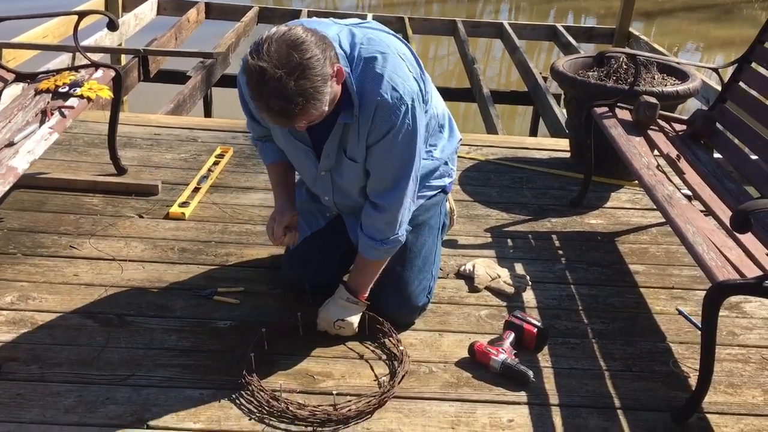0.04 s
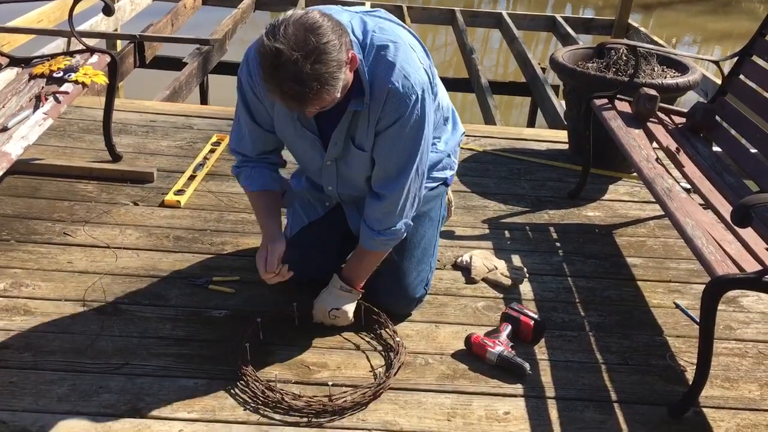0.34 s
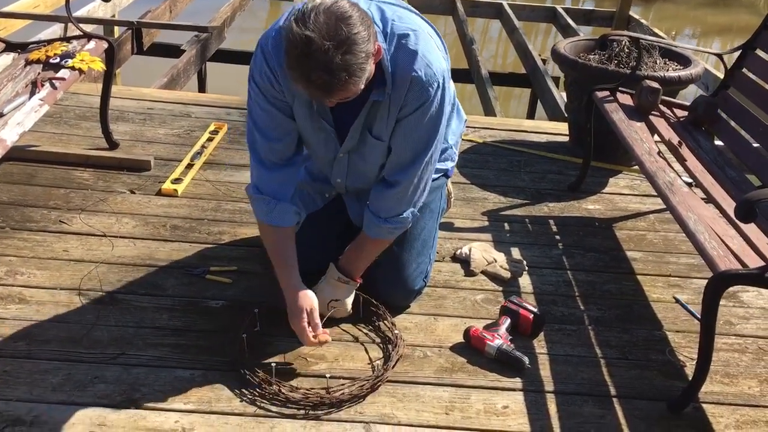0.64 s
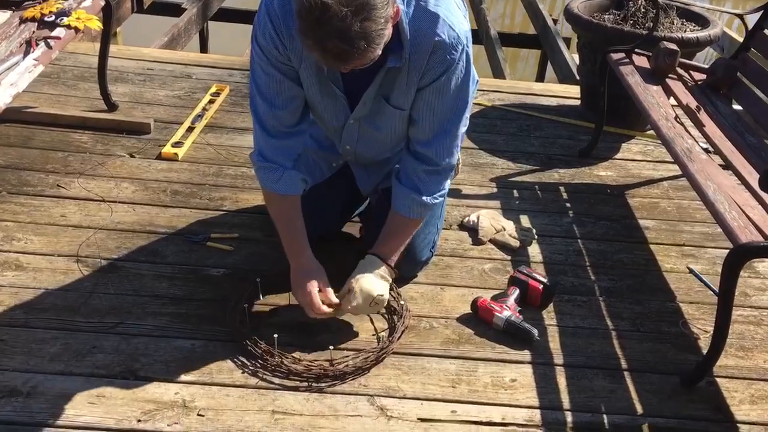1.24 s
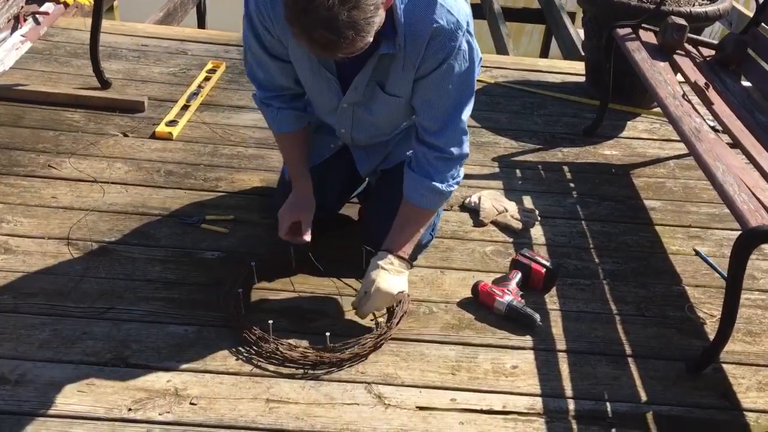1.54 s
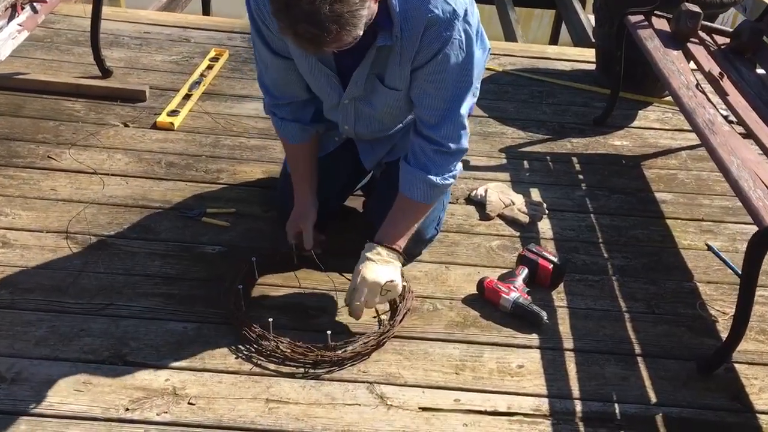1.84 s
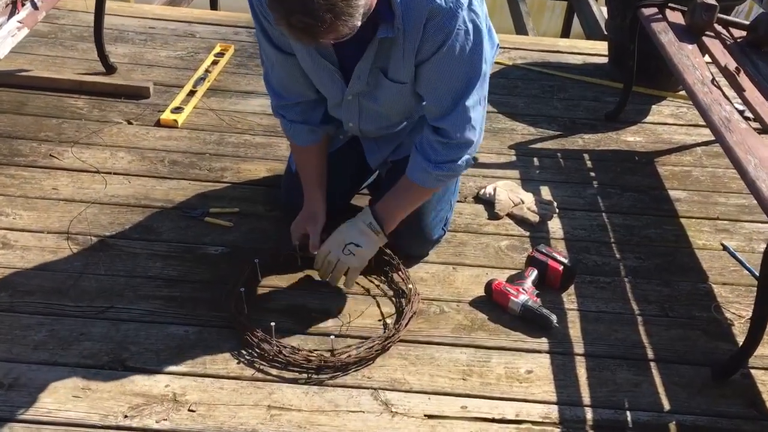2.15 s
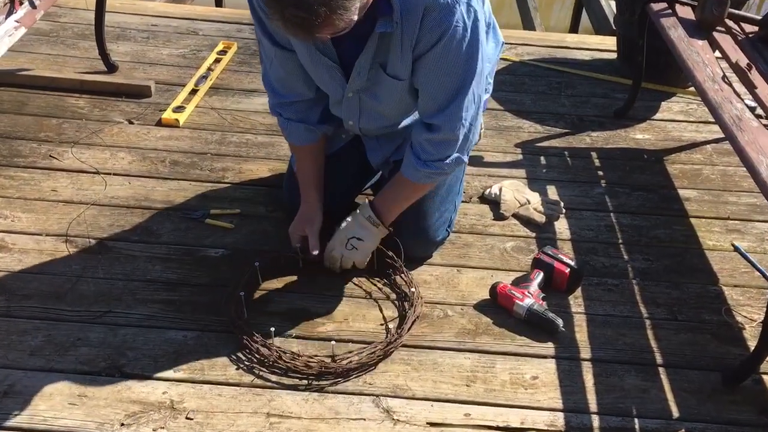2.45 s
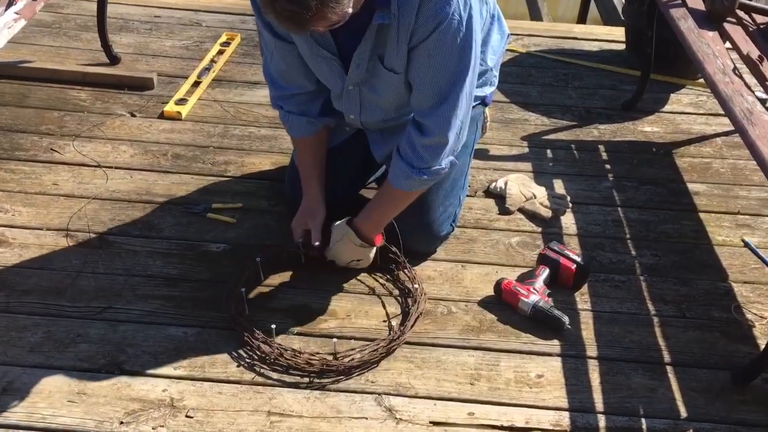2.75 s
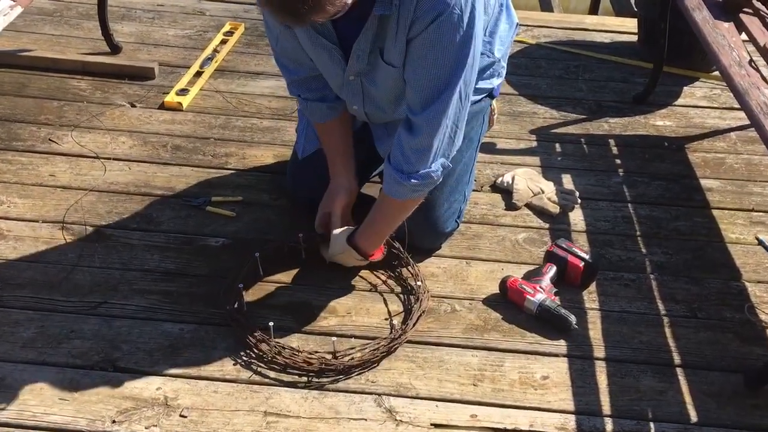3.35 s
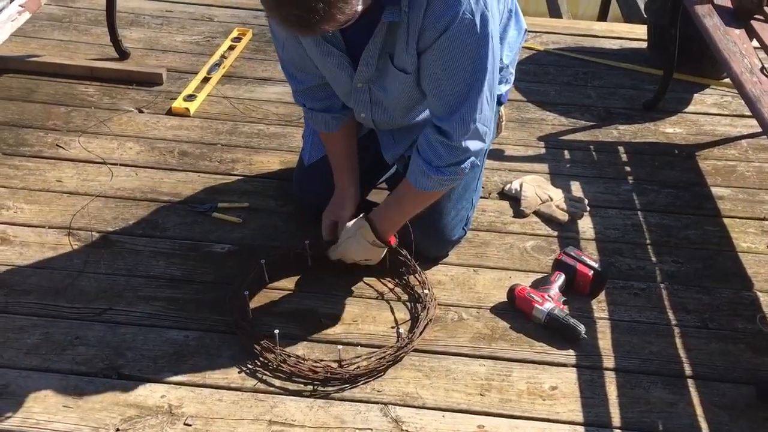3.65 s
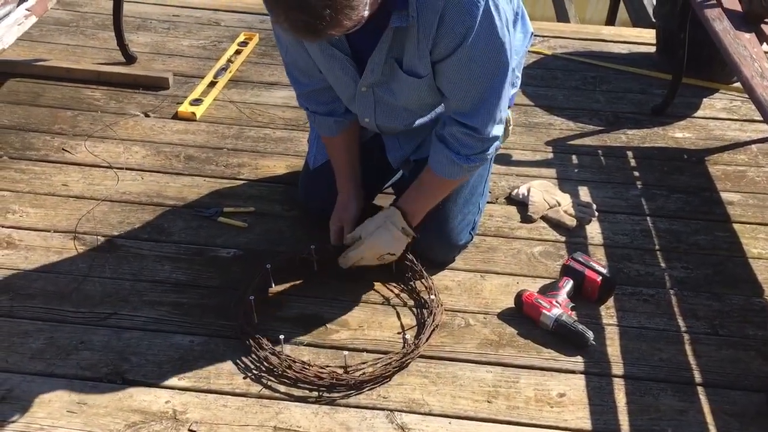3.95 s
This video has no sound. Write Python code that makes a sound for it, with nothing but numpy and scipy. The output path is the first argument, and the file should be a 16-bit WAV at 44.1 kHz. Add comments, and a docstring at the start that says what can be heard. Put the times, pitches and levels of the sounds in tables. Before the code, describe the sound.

Barbed wire is handled on outdoor wooden boards: scattered ringing clicks, dull knocks and brief rasps, then a bright ping in a busier cluster, and a few last taps. Wind rumbles and bumps softly at the microphone throughout.

```python
"""Rusty barbed wire on a wooden deck

A coil of barbed wire is handled outdoors: strands catch, click and tap the boards, setting wire and
wood ringing, and one barb snaps free. Wire and glove scrape between the clicks.
Soft low bumps and a breeze rumble at the microphone, over a faint outdoor hiss."""
import sys
import numpy as np
from scipy.fft import rfft, irfft
from scipy.io import wavfile
from scipy.ndimage import map_coordinates

SR = 44100
rng = np.random.default_rng(int(sys.argv[2]) if len(sys.argv) > 2 else 0)


def store_wav(level_fs):
    """Save 16-bit WAV to argv[1]."""
    pcm = np.round(np.clip(np.atleast_2d(level_fs), -1, 1) * 32767)
    wavfile.write(sys.argv[1], SR, pcm.T.astype(np.int16))


N = 176400  # 4 seconds
TOP_HZ = 16000

# The pitches at which the deck boards ring: (pitch [Hz], width [Hz], level [dB])
BOARD_TONES = [(692, 78, 2), (939, 48, 0), (1300, 235, -2), (1800, 120, -10.5), (2370, 120, -14.5),
               (3650, 200, -33)]


def clicks():
    """Each contact rings the boards and a different length of wire; the highest part dies first."""
    # Wire contacts: (time [s], boards level [dB], clack level [dB], wire ring level [dB])
    contacts = [(.002,-38.5,-38.5,-40.5), (.014,-62,-48.5,-44.5), (.253,-47,-49.5,-60),
                (.379,-48,-48,-52.5), (.386,-46,-56,-52.5), (.494,-54.5,-51,-61.5), (.519,-59.5,-61,-70),
                (.682,-46,-50,-56), (.739,-51.5,-61.5,-78), (.809,-48.5,-50.5,-67), (1.229,-43,-46.5,-50.5),
                (1.254,-44,-50.5,-55.5), (1.361,-50.5,-49.5,-57), (1.5,-49,-58,-63),
                (1.516,-46.5,-51.5,-65), (1.563,-62,-62.5,-65), (1.617,-47,-54,-64), (1.823,-51,-53,-62.5),
                (2.022,-42,-50.5,-62), (2.109,-43,-49.5,-47.5), (2.263,-54.5,-59.5,-64),
                (2.512,-45,-43.5,-47), (2.527,-47,-43.5,-46.5), (2.545,-48,-48.5,-49.5),
                (2.599,-44.5,-51.5,-48.5), (2.628,-51,-63,-57), (2.643,-55,-56,-59), (2.674,-44,-51,-44),
                (2.69,-61,-60,-55), (2.736,-52,-58,-61.5), (2.789,-51.5,-56.5,-68), (2.879,-54.5,-60,-67),
                (2.98,-61,-66,-66), (3.113,-45.5,-50.5,-50.5), (3.728,-53,-53.5,-59.5), (3.747,-66,-65,-57),
                (3.784,-48.5,-51,-56.5), (3.806,-44,-47.5,-57.5), (3.846,-48.5,-55,-58.5),
                (3.935,-49.5,-54,-57)]
    # The four parts of a click, low to high: boards, clack, wire ring, fizz
    # (low edge [Hz], high edge [Hz], fade time [s], attack [s], tail level [dB], level offset [dB])
    parts = [(432, 1134, 0.076, 0.0017, -9.5, -2), (1130, 3180, 0.079, 0.00023, -26, 0),
             (3360, 9400, 0.045, 0.0002, -23, -1.5), (9600, 14000, 0.019, 0.000087, -27, 2)]
    out, t = np.zeros(N), np.arange(SR // 3) / SR
    onset = t < .012
    wire_width_hz = 70
    for start, boards_db, clack_db, wire_db in contacts:
        pitches = np.geomspace(1700, 15000, num=19) * np.exp(rng.normal(0, .06, size=19))
        wire_tones = [(hz, wire_width_hz, rng.normal(0, 3)) for hz in pitches]
        # The added constants let some noise through between the tones.
        body = lambda hz: (resonances(hz, BOARD_TONES) + amp(-9)) * (resonances(hz, wire_tones) + amp(-10))
        levels = [boards_db, clack_db, wire_db, wire_db - 9.5]
        for db, (lo, hi, fade, attack, tail_db, offset_db) in zip(levels, parts):
            noise = filtered(rng.standard_normal(len(t)), lambda hz: body(hz) * band(hz, lo, hi))
            tail = amp(tail_db) * ring(t, fade_s=.22, attack_s=.015)
            hit = noise * (ring(t, fade, attack) + tail)
            add(out, start, amp(db + offset_db) * hit / np.std(hit[onset]))
        thud = shaped_noise(len(t), lambda hz: band(hz, 170, 480))  # the deck's low answer
        add(out, start, amp(boards_db - 5) * thud * ring(t, fade_s=.15, attack_s=.00028))
    return out


def coil_echo(x):
    """Each click also travels round the coil and returns, high pitches before low ones."""
    delay_s = .017  # at 1000 Hz
    echo = lambda hz: band(hz, 600, 3500) * np.exp(-4j * np.pi * delay_s * np.sqrt(1000 * hz))
    return x + amp(-9) * filtered(np.pad(x, (0, SR // 2)), echo)[:N]


def pings():
    """A free length of wire or board rings on after some contacts."""
    # Lingering tones: (time [s], pitch [Hz], level [dB], fade time [s])
    tones = [(.495, 925, -52.5, .17), (1.361, 3300, -50, 0.038), (1.361, 2160, -45, 0.1),
             (3.784, 1810, -38, 0.041), (3.784, 722, -37.5, .14)]
    out, t = np.zeros(N), np.arange(SR // 4) / SR
    for start, hz, db, fade in tones:
        phase = 2 * np.pi * (hz * t + rng.random())
        rub = .3 * wobble(250)[:len(t)]  # rubbing on nearby strands makes the tone waver
        add(out, start, amp(db) * ring(t, fade, attack_s=.00071) * np.sin(phase + rub))
    return out


def twangs():
    """High pitches run along a bending strand faster than low ones, so a twang is a falling chirp."""
    # Waves along a strand: (time [s], travel time at 1000 Hz [s], level [dB])
    waves = [(1.234, 0.057, -51.5), (1.352, .043, -50)]
    centre_hz, width_octaves = 1880, .79  # the range that a strand carries best
    out, t = np.zeros(N), np.arange(1, SR // 8) / SR
    for start, travel_s, db in waves:
        hz = np.minimum(1000 * (travel_s / t) ** 2, TOP_HZ)
        carried = np.exp(-(np.log2(hz / centre_hz) / width_octaves) ** 2 / 2)
        rub = 1.2 * wobble(796)[:len(t)]
        add(out, start, amp(db) * carried * np.sin(2 * np.pi * np.cumsum(hz) / SR + rub))
    return out


def barb_snap():
    """A barb slips off a tight strand with a short bright ping."""
    # The tones of the snap: (pitch [Hz], level [dB], fade time [s])
    tones = [(5800, -13.5, 0.0063), (6750, -22.5, 0.0055), (5750, -50, 0.049), (2260, -15.5, 0.0036)]
    out, t = np.zeros(N), np.arange(SR // 4) / SR
    ping = sum(amp(db) * ring(t, fade, attack_s=.00053) * sine(hz, t) for hz, db, fade in tones)
    add(out, start_s=2.527, x=ping)
    return out


def squeak():
    """Wire slips on wire with a brief rising squeak."""
    start, length_s = 2.659, .017
    out, progress = np.zeros(N), np.linspace(0, 1, int(length_s * SR))
    hz = (4450 + 900 * progress) * (1 + .08 * wobble(1800)[:len(progress)])
    add(out, start, amp(-45) * np.sin(np.pi * progress) * np.sin(2 * np.pi * np.cumsum(hz) / SR))
    return out


def knocks():
    """Soft contacts ring only the low tones of a board."""
    # Dull knocks: (time [s], level [dB], pitch [Hz], fade time [s])
    hits = [(.003, -33, 170.8, 0.2), (.008, -41.5, 302, 0.23), (2.215, -39.5, 260, 0.097),
            (3.055, -39.5, 242.7, 0.13), (3.884, -38.5, 578, 0.15)]
    # The tones in each knock: (pitch [multiple of the knock's pitch], level [dB])
    tones = [(0.999, 1.5), (1.128, -3.5), (1.431, -3.5), (2.13, -15)]
    out, t = np.zeros(N), np.arange(SR // 3) / SR
    for start, db, hz, fade in hits:
        wood = sum(amp(tone_db) * sine(hz * ratio, t) for ratio, tone_db in tones)
        flutter = 1 + .45 * wobble(220)[:len(t)]
        add(out, start, amp(db) * wood * ring(t, fade, attack_s=.003) * flutter)
    return out


def scrapes():
    """Grains of rust rasp under each stroke, heard in the boards and as a hiss."""
    # Strokes of wire and glove: (peak time [s], rise [s], fall [s], body level [dB], hiss level [dB])
    strokes = [(.32, 0.05, 0.072, -57, -78), (.85, 0.048, 0.037, -50, -57), (1.53, 0.23, 0.11, -66, -75),
               (1.7, 0.062, 0.45, -66, -85), (2.42, 0.067, 0.05, -60.5, -65), (2.517, 0.03, 0.03, -43, -50),
               (2.671, 0.053, 0.018, -54, -63.5), (2.79, 0.086, 0.073, -58.5, -67.5),
               (2.91, 0.036, 0.095, -56, -71.5), (3.13, 0.19, 0.043, -61.5, -70),
               (3.323, 0.024, 0.025, -52.5, -74), (3.83, 0.15, 0.13, -59.5, -67)]
    # Tone of the scrape's lower body: (frequency [Hz], level [dB])
    body_curve = [(200, -43), (450, -1), (700, 2.5), (1500, -3.5), (2600, -5.5), (4000, -17), (8000, -84)]
    # Tone of its hiss: (frequency [Hz], level [dB])
    hiss_curve = [(1500, -30), (2800, -7), (6500, 5.5), (9000, 0), (10500, -2), (13000, -4), (16000, -14)]
    grains_per_s, catches_per_s = 1200, 90
    t = np.arange(N) / SR
    swells = np.array([np.exp(-np.where(t < peak, (abs(peak - t) / rise) ** 1.28, ((t - peak) / fall) ** 2))
                       for peak, rise, fall, _, _ in strokes])
    body_db, hiss_db = np.transpose(strokes)[-2:]
    grains = (rng.random(N) < grains_per_s / SR) * rng.standard_normal(N)
    grains *= amp(2 * rng.standard_normal(N))
    catch = amp(2 * wobble(catches_per_s))  # the stroke sticks and slips
    rasp = catch * (unit(grains) + .7 * rng.standard_normal(N))
    wood = lambda hz: colour(body_curve)(hz) * (resonances(hz, BOARD_TONES) + amp(12))
    body = unit(filtered(catch * rng.standard_normal(N), wood))
    hiss = unit(filtered(rasp, colour(hiss_curve)))
    return (amp(body_db) @ swells) * body + (amp(hiss_db) @ swells) * hiss


def bumps():
    """Soft low pushes of a wave or two, each with a puff of swirling air."""
    # Bumps at the microphone: (time [s], level [dB], pitch [Hz])
    pushes = [(.426,-39,141), (.953,-40,74.4), (1.448,-34.5,85), (1.633,-34,100), (1.741,-30.5,75),
              (2.037,-33.5,60.5), (2.114,-35.5,59), (2.225,-35.5,141), (2.492,-36,71), (2.583,-33.5,93),
              (2.882,-34,67), (3.092,-32,88), (3.176,-30,91), (3.378,-34.5,125), (3.421,-33,64),
              (3.451,-33.5,100), (3.524,-33.5,88)]
    half_length_cycles, puff_s = .89, .013
    out, t = np.zeros(N), np.arange(N) / SR
    air = shaped_noise(N, lambda hz: band(hz, 100, 240))
    for peak, db, hz in pushes:
        offset = t - peak
        push = np.exp(-abs(offset * hz / half_length_cycles) ** 3.6) * sine(hz, offset)
        puff = air * np.exp(-abs(offset) / puff_s)
        out += amp(db - .5) * push + amp(db - 10) * puff
    return out


def breeze():
    """An uneven breeze rumbles under a faint, nearly steady hiss."""
    # Slow rise and fall of the breeze: (time [s], level [dB])
    strength = [(0, -52), (1.5, -49.5), (2.5, -47.5), (4, -49)]
    # Tone of the rumble: (frequency [Hz], level [dB])
    rumble_curve = [(22, -38), (43, 2.5), (68, -2), (140, -7.5), (240, -17.5), (360, -22.5), (600, -56),
                    (1500, -120)]
    # Tone of the outdoor hiss: (frequency [Hz], level [dB])
    hiss_curve = [(240, -16), (400, -9), (950, -13.5), (2000, -15.5), (4300, -26), (7000, -25.5),
                  (16000, -33.5)]
    trend_db = np.interp(np.arange(N) / SR, *np.transpose(strength)) + 3.5
    rumble = shaped_noise(N, colour(rumble_curve)) * amp(trend_db + 3.6 * wobble(22.13))
    hiss = shaped_noise(N, colour(hiss_curve)) * amp(-66.5 + .13 * wobble(8.9))
    return rumble + hiss


def amp(db):
    """Turn decibels into a multiplier."""
    return 10 ** (np.asarray(db) / 20)


def unit(x):
    """Scale a sound to an average (rms) level of 1."""
    return x / np.sqrt(np.mean(x ** 2) + 1e-20)


def colour(points):
    """A tone curve through (frequency [Hz], level [dB]) points."""
    freqs, db = np.transpose(points)
    return lambda hz: amp(np.interp(np.log(hz + 1), np.log(freqs + 1), db))


def filtered(x, curve):
    """Multiply each frequency in x by the curve's value there."""
    return irfft(rfft(x) * curve(np.fft.rfftfreq(len(x), 1 / SR)), len(x))


def shaped_noise(samples, curve):
    """Noise with the given tone curve, at level 1."""
    return unit(filtered(rng.standard_normal(samples), curve))


def band(hz, lo, hi):
    """A tone curve that drops steeply below lo and above hi."""
    return 1 / np.sqrt((1 + (lo / (hz + 1)) ** 12) * (1 + (hz / hi) ** 12))


def resonances(hz, peaks):
    """A tone curve with a peak for each (pitch [Hz], width [Hz], level [dB])."""
    return np.sqrt(sum(amp(db) ** 2 / (1 + (2 * (hz - pitch) / width) ** 2) for pitch, width, db in peaks))


def wobble(rate):
    """A smooth curve through `rate` random values a second."""
    return map_coordinates(rng.standard_normal(1024), [np.arange(N) * rate / SR + 2], mode="mirror")


def sine(hz, t):
    """A pure tone that starts at a random point in its wave."""
    return np.sin(2 * np.pi * (hz * t + rng.random()))


def ring(t, fade_s, attack_s):
    """Loudness of a struck thing: a quick rise, then a fall of 60 dB over the fade time."""
    return np.exp(-np.log(1000) * t / fade_s) * (1 - np.exp(-t / attack_s))


def add(out, start_s, x):
    """Mix x into out at the start time."""
    i = max(0, round(start_s * SR))
    out[i:i + len(x)] += x[:max(0, N - i)]


def scene():
    """Everything heard from one place on the deck, in one channel."""
    wire = coil_echo(clicks()) + pings() + twangs() + barb_snap() + squeak()
    return (wire + knocks() + scrapes() + bumps() + breeze())[None]


def record(dry):
    """The microphone has a dip in the high treble and cuts off above TOP_HZ."""
    dip = colour([(9000, -0.5), (10500, -5), (12000, 1.5)])
    microphone = lambda hz: dip(hz) / np.sqrt(1 + (hz / TOP_HZ) ** 160)
    return filtered(np.pad(dry[0], (0, SR // 2)), microphone)[None, :N]


dry = scene()
out = record(dry)
store_wav(out)
```